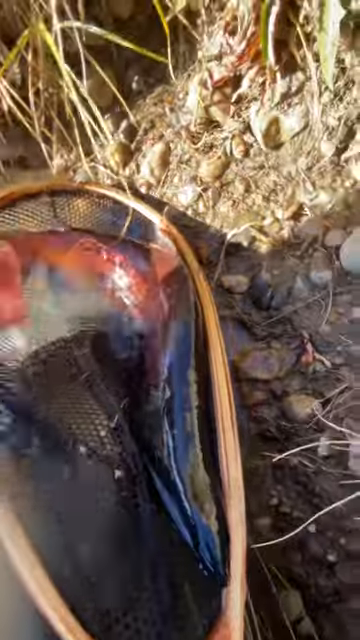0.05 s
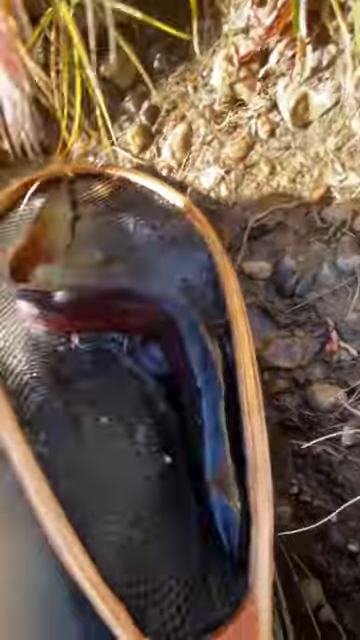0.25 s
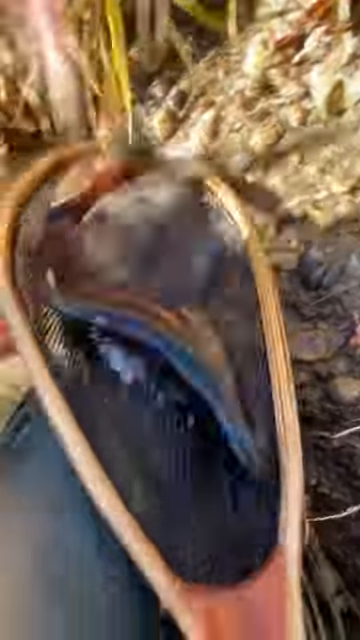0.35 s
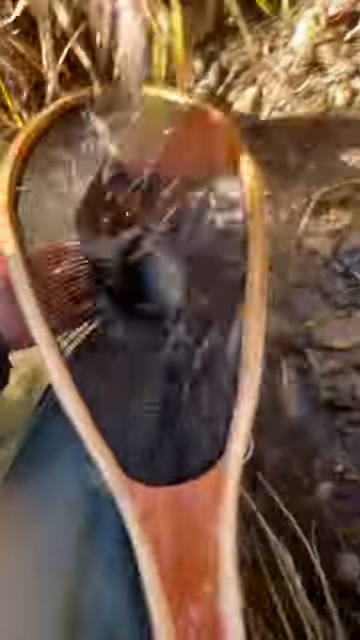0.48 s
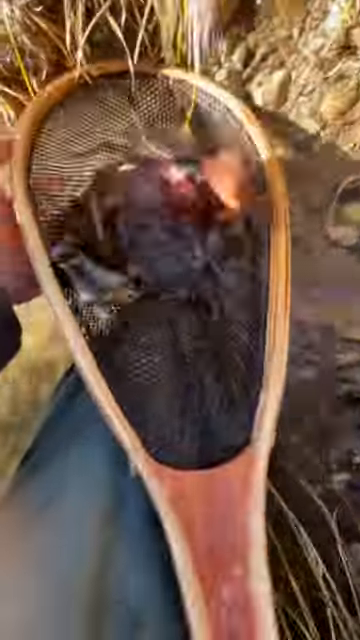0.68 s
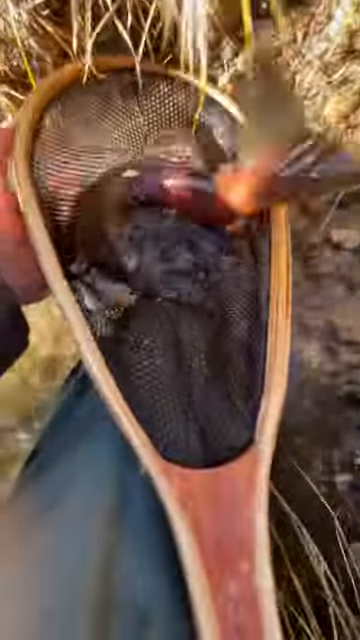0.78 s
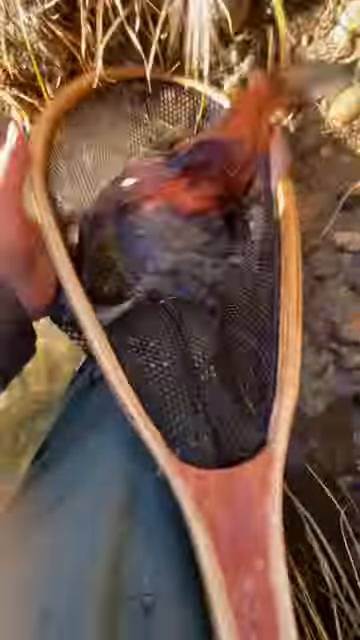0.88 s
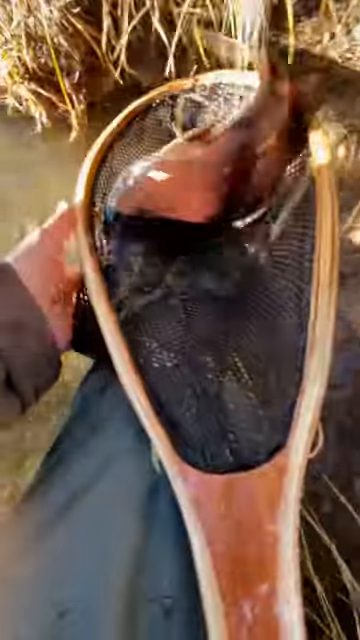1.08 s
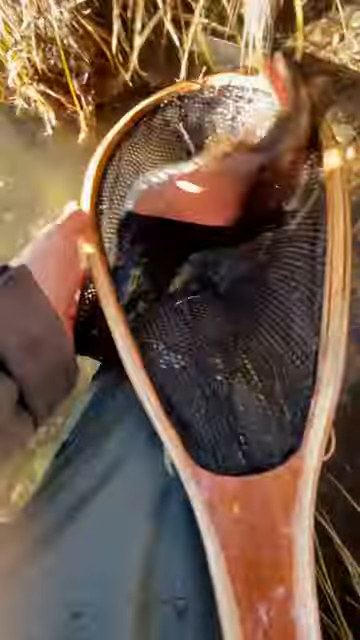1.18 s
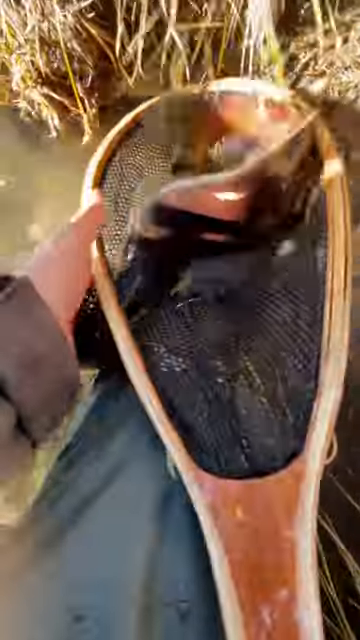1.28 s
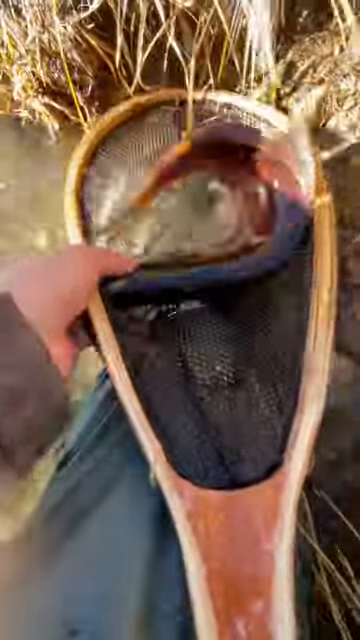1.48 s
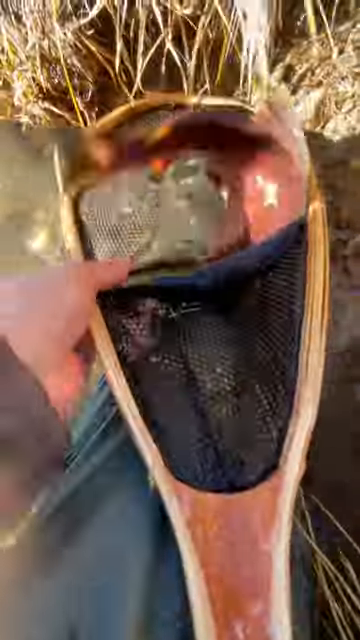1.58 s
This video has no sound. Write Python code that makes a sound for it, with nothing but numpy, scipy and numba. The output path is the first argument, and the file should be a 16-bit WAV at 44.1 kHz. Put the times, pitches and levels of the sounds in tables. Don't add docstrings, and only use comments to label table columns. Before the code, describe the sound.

Fish thrashing in a wet landing net, one hard splashy slap, then weaker spatters and drips

```python
import sys
import numpy as np
from scipy import signal
from scipy.fft import rfft, irfft
from scipy.io import wavfile
from scipy.ndimage import uniform_filter1d
from numba import njit

SR = 44100
rng = np.random.default_rng(int(sys.argv[2]) if len(sys.argv) > 2 else 0)


def volts_from_db(level):
    exponent = np.asarray(level, float) / 20
    return 10 ** exponent


def wrap_up_sound(samples):
    columns = np.atleast_2d(samples).T
    tamed = np.clip(columns, -1, 1)
    steps = np.round(tamed * 32767).astype(np.int16)
    wavfile.write(sys.argv[1], SR, steps)


N = 72765

# start in seconds, peak in dB, centre in Hz, ring T60 in seconds, broad crack in dB.
SLAPS = [(0.2738, -19, 5900, 0.0086, 1.5), (0.2892, -3.5, 2270, 0.02, -5),
         (0.2903, -2.5, 5150, 0.0094, -5.5), (0.3048, -19, 1700, 0.02, -16), (0.3299, -20, 3500, 0.02, -10),
         (0.337, -19, 1990, 0.039, -8), (0.3595, -13, 2560, 0.016, -15), (0.3644, -16.5, 1300, 0.06, -18),
         (.353, -22.5, 2270, .018, -3), (0.373, -26, 1300, 0.023, -7), (0.435, -29, 1530, .015, 1),
         (0.4438, -27, 2550, 0.042, 0), (.479, -36, 1500, 0.014, 0), (0.5313, -21, 3720, 0.017, 0.5),
         (0.536, -19.5, 3240, 0.015, -3.5), (0.54, -21, 910, 0.038, -26), (0.5538, -26.5, 4500, 0.011, 1.5),
         (0.5899, -25.5, 1410, 0.029, -3), (0.629, -28.5, 6600, 0.015, -2.5),
         (0.7816, -23, 3560, 0.038, -10.5), (0.9007, -30.5, 1970, 0.024, -19),
         (0.9534, -30.5, 2600, 0.033, 0), (1.1707, -15, 7900, 0.019, -6), (1.178, -34.5, 7500, 0.023, 5.5),
         (1.2321, -20.5, 10000, 0.025, -1), (1.238, -29.5, 4460, .03, -2), (1.245, -24, 3870, 0.016, -20),
         (1.2555, -28.5, 4930, 0.026, -5.5), (1.2787, -21.5, 5440, 0.02, -8),
         (1.284, -26.5, 9100, 0.022, -18), (1.318, -28.5, 3340, 0.034, 2), (1.3581, -27, 5060, 0.017, 1),
         (1.372, -29, 1880, 0.04, -20), (1.6161, -22, 6700, 0.021, -16)]
# start in seconds, peak in dB, centre in Hz.
SPITS = [(0.171, -28, 10500), (.2294, -32, 9900), (0.281, -25, 10100), (.52, -33, 8500),
         (0.5545, -21.5, 9500), (0.56, -40, 10000), (.5836, -32, 10100), (.592, -39, 10700),
         (0.647, -36.5, 9800), (.6889, -50, 11100), (0.703, -38.5, 10400), (.9233, -35.5, 10600),
         (.9548, -33, 10800), (1.073, -44, 10800), (1.091, -47, 9990), (1.1125, -40, 11300),
         (1.139, -34, 10800), (1.2227, -32, 10200), (1.257, -36, 9800), (1.3389, -40, 8770),
         (1.373, -30, 10500), (1.3927, -31, 9700), (1.447, -47, 10000), (1.509, -40, 9430),
         (1.5406, -39, 9170), (1.6171, -23.5, 10800)]
# frequency in Hz, density in dB per Hz.
SLAP_TONE = [(700, -30), (2100, -3), (3400, -9), (6000, -3.5), (9000, -10), (13000, -24.5), (16000, -13)]
# start in seconds, peak in dB, first pitch in Hz, length in seconds, glide in octaves.
THUMPS = [(.217, -31.5, 191, 0.024, -0.63), (.279, -30.5, 190, 0.01, -0.49),
          (.298, -26, 189.5, 0.017, -0.52), (.314, -32, 192, 0.043, 0.18), (.345, -35, 306, 0.026, 0.0091),
          (.36, -43, 72, 0.039, 0.75), (.54, -35.5, 96, 0.021, -0.099), (.592, -32, 278, 0.011, 0.56),
          (.53, -34, 336, 0.012, -0.012), (.785, -38, 180, 0.019, 0.059), (.91, -45.5, 176, 0.022, 0.09),
          (1.248, -37.5, 137, 0.015, 0.047), (1.262, -40, 65, 0.031, -0.069),
          (1.388, -28.5, 195, 0.025, -1.54), (1.43, -40, 196, 0.0048, 0.93),
          (1.55, -40.5, 123, 0.019, -0.082), (1.58, -42.5, 76, 0.045, 0.32)]
# start in seconds, peak in dB, first pitch in Hz, length in seconds, glide in octaves.
BUBBLES = [(.313, -23, 1020, 0.013, -0.23), (.345, -24, 1860, 0.0082, 0.042),
           (.354, -25, 2170, 0.0056, 0.33), (.367, -30, 1334, 0.018, -0.48), (.384, -26, 1175, .007, -0.19),
           (.458, -33, 944, 0.0058, -0.35), (1.345, -41, 990, 0.0043, 0.017),
           (.523, -34, 677, 0.008, 0.021), (.547, -35, 1404, 0.009, 0.06), (.574, -26, 990, 0.013, 0.39),
           (.590, -32.5, 576, 0.0083, -0.81), (.6385, -33, 5000, 0.0045, 0.084),
           (1.354, -27, 840, 0.013, 0.37), (1.371, -34, 1795, 0.0059, -0.19),
           (1.381, -38.5, 471, 0.014, -0.039)]
# start in seconds, peak in dB, pitch in Hz.
DROPS = [(.391, -35, 4820), (.421, -30.5, 1800), (.491, -30.5, 1670), (.65, -44, 2400), (0.672, -39, 2130),
         (.686, -39, 2220), (0.78, -35, 5500), (0.803, -38, 2480), (1.245, -38, 4030), (.472, -30.5, 2570),
         (.711, -42, 4200), (.735, -47, 2300), (.736, -48, 5760), (.188, -39, 2070), (.258, -34.5, 3820),
         (1.255, -31.5, 2380), (1.358, -37, 4700), (1.482, -40, 4500), (1.507, -42.5, 1800),
         (1.474, -41, 1840)]
# start in seconds, peak in dB.
KNOCKS = [
    (.536, -37),
    (.783, -44.5),
    (.903, -48),
    (1.228, -47.5),
]
# time in seconds, level in dB.
SLOSH_EFFORT = [(0, -63.5), (.07, -48), (.15, -47.5), (.18, -41), (.25, -45.5), (.33, -31.5), (.4, -38),
                (.48, -41), (.515, -44.5), (.6, -47.5), (.75, -59), (.8, -43), (.865, -55.5), (.93, -47.5),
                (1.08, -55), (1.24, -48), (1.4, -47), (1.65, -50)]
# frequency in Hz, density in dB per Hz.
SLOSH_TONE = [(60, -1), (250, -3.5), (560, -10.5), (1000, -3.5), (2300, -4.5), (4000, -4.5), (10000, -28.5),
              (16000, -11)]
# time in seconds, level in dB.
DRAG_LEVEL = [(0, -70.5), (.07, -49), (.15, -50.5), (.175, -45), (.24, -51), (.34, -42), (.46, -46),
              (.515, -57.5), (.75, -60), (.84, -47), (.865, -59.5), (.96, -52), (1.05, -61), (1.22, -52),
              (1.27, -68), (1.305, -60.5), (1.45, -51.5), (1.65, -55.5)]
# frequency in Hz, density in dB per Hz.
DRAG_TONE = [(1500, -28), (4200, -23), (5200, -5), (6200, -6.5), (7000, -17.5), (9000, -9.5), (12500, -16),
             (16000, -34)]
# time in seconds, level in dB.
SWISH_LEVEL = [
    (0, -73),
    (.045, -49),
    (.1, -49.5),
    (.18, -45),
    (.23, -74),
    (.3, -80),
]
# time in seconds, level in dB.
BURBLE_LEVEL = [(0, -85), (.2, -62), (.3, -46.5), (.4, -70), (.5, -64), (.65, -86), (.76, -69), (.9, -55.5),
                (1.03, -63), (1.18, -49.5), (1.3, -69), (1.45, -53), (1.65, -56.5)]
# frequency in Hz, lead of the left in radians.
PORT_LEAD = [(0, 0), (600, 1.7), (1100, .9), (1800, .7), (2700, 2.3), (5600, .8), (7000, 3.14), (8600, 4.5),
             (10000, 6.1), (11400, 6.6), (12900, 9.2), (14500, 9.6), (15900, 12.5)]
# frequency in Hz, share heard alike (0 to 1).
LIKENESS = [(50, .45), (200, .85), (600, .2), (3000, .6), (7000, .62), (12000, .76)]
# frequency in Hz, left minus right in dB.
BALANCE = [(60, 1.5), (200, -5), (600, 3.5), (1500, 1), (5000, -1)]


def unit(x):
    return x / np.sqrt(np.mean(x ** 2))


def noise():
    return rng.standard_normal(N)


def bin_hz():
    return np.arange(N // 2 + 1) * SR / N + 1


def curve(table):
    return np.interp(np.arange(N) / SR, *np.array(table).T)


def colour(x, table):
    hz, db = np.array(table).T
    gain = volts_from_db(np.interp(np.log(bin_hz()), np.log(hz), db, left=-60))
    return unit(irfft(rfft(x) * gain, N))


def walk(rate):
    k = int(SR / rate)
    held = np.repeat(rng.standard_normal(N // k + 1), k)
    return 1.3 * uniform_filter1d(uniform_filter1d(held, k), k)[:N]


def flicker(table, depth_db, rate):
    spectrum = rfft(colour(noise(), table))
    octave = np.log2(bin_hz())
    out = np.zeros(N)
    for centre in range(4, 15):
        band = irfft(spectrum * np.clip(1 - abs(octave - centre), 0, 1), N)
        out += band * volts_from_db(depth_db * walk(rate))
    return unit(out)


def resonant_noise(x, hz, q):
    b, a = signal.iirpeak(hz, q, SR)
    return unit(signal.lfilter(b, a, signal.lfilter(b, a, x)))


@njit
def add(out, start, size, hz, length, glide, rise):
    for k in range(len(start)):
        n, phase = length[k] * SR, 0.
        for i in range(int(2.5 * n)):
            u, j = i / n, int(start[k] * SR) + i
            if j >= len(out):
                break
            phase += 2 * np.pi * min(hz[k] * 2 ** (glide[k] * min(u, 1.3)), 19000.) / SR
            out[j] += size[k] * u / rise * np.exp(1 - u / rise) * np.sin(phase)


def tones(table, rise):
    out = np.zeros(N)
    start, db, hz, length, glide = np.array(table, float).T.copy()
    add(out, start, volts_from_db(db), hz, np.maximum(length, .001), glide, rise)
    return out


def swarm(hz, octaves, cycles, scatter_db, count):
    when, size, loud, life = rng.random((count, 4)).T
    out = np.zeros(N)
    pitch = hz * 2 ** (octaves * np.log(size / (1 - size)) / 1.778)
    level = volts_from_db(np.minimum(-scatter_db * np.log(loud), 2.6 * scatter_db))
    add(out, when * N / SR, level, pitch, cycles / pitch * (.5 + life), .3 * life, .3)
    return unit(out)


def slaps():
    rise_s, width = 0.001, 0.68
    lead_db, lead_t60_s = -18, 0.053
    spray_db, spray_t60_s = -23, 0.19
    out = np.zeros(N)
    t = np.arange(-900, 5000) / SR
    broad = colour(noise(), SLAP_TONE)
    white = rng.standard_normal(N + len(t))
    crackle = unit(volts_from_db(3 * walk(1500)))
    gathering = np.clip(1 + t / rise_s, 0, 1) ** 2 + volts_from_db(lead_db + 60 * t / lead_t60_s)
    spray = volts_from_db(spray_db - 60 * t / spray_t60_s)
    spits = [(s, db, hz, .011, -7) for s, db, hz in SPITS]
    for s, db, hz, t60, broad_db in SLAPS + spits:
        i = int((s + rise_s + t[0]) * SR)
        n = min(len(t), N - i)
        body = resonant_noise(white[i:i + len(t)], hz, 1 / width)[:n]
        body = body + volts_from_db(broad_db) * broad[i:i + n]
        envelope = np.where(t < 0, gathering, volts_from_db(-60 * t / t60) + spray)[:n]
        out[i:i + n] += 0.37 * volts_from_db(db) * body * crackle[i:i + n] * envelope
    return out


def thumps():
    return tones(THUMPS, rise=0.24)


def bubbles():
    return tones(BUBBLES, rise=.3)


def drops():
    return tones([(s, db, hz, 0.0042, .1) for s, db, hz in DROPS], rise=.3)


def knocks():
    return tones([(s, db, 670, 0.017, 0) for s, db in KNOCKS], rise=.3)


def slosh():
    fizz = swarm(1700, octaves=0.783, cycles=5.6, scatter_db=2.5, count=2600)
    wash = flicker(SLOSH_TONE, depth_db=3.85, rate=35.23)
    return volts_from_db(curve(SLOSH_EFFORT)) * (wash + volts_from_db(-4) * fizz)


def drag():
    mist = swarm(6890, octaves=.45, cycles=8.7, scatter_db=3.2, count=2400)
    hiss = flicker(DRAG_TONE, depth_db=3.6, rate=40)
    return volts_from_db(curve(DRAG_LEVEL)) * (hiss + volts_from_db(2) * mist)


def swish():
    centre_hz, width_hz = 5650, 1200
    return volts_from_db(curve(SWISH_LEVEL)) * resonant_noise(noise(), centre_hz, centre_hz / width_hz)


def burble():
    return volts_from_db(curve(BURBLE_LEVEL)) * swarm(404.4, octaves=0.524, cycles=8.9, scatter_db=1.1, count=350)


def rumble():
    swell_db = -56.5 + 0.85 * (curve(SLOSH_EFFORT) + 45) + 1.9 * walk(14.8)
    return volts_from_db(swell_db) * resonant_noise(noise(), 60.6, .8)


def background():
    return slosh() + drag() + rumble() + burble()


def scene():
    f = bin_hz()

    def over(table):
        hz, value = np.array(table).T
        return np.interp(np.log(f), np.log(hz), value)

    wash = rfft(background() + swish())
    other = rfft(background())
    ringing = (bubbles() + drops() + knocks()) * volts_from_db(3.2 * walk(450))
    hits = rfft(slaps() + ringing + thumps())

    like = np.clip(over(LIKENESS), 0, 1)
    lead = np.interp(f, *np.array(PORT_LEAD).T)
    tilt = volts_from_db(over(BALANCE) / 2) * np.exp(.5j * lead)
    in_step = 1 - np.clip(f / 4500, 0.75, 1)
    near = tilt * np.exp(-.5j * lead * in_step)
    mid = np.sqrt((1 + like) / 2) * wash
    side = volts_from_db(-7.5) * rfft(slaps()) + np.sqrt((1 - like) / 2) * other
    left = irfft(hits * near + (mid + side) * tilt, N)
    right = irfft(hits / near + (mid - side) / tilt, N)
    return np.array([left, right])


def joint(x):
    weak_db, from_hz, jump_db = -5.2, 5500, 5
    f, _, z = signal.stft(np.array([x[0] + x[1], x[0] - x[1]]) / 2, SR, nperseg=1024)
    power = uniform_filter1d(uniform_filter1d(abs(z) ** 2, size=16, axis=1), size=5, axis=2)
    power = power[:, ::12].repeat(12, axis=1)[:, :len(f)]
    treble = (abs(z[:, f > from_hz]) ** 2).sum(axis=(0, 1))
    hit = treble > volts_from_db(2 * jump_db) * signal.medfilt(treble, 11)
    strong = power > volts_from_db(2 * weak_db) * power[::-1]
    keep = strong | (f < from_hz)[:, None] | hit
    mid, side = signal.istft(z * keep, SR, nperseg=1024)[1][:, :N]
    return np.array([mid + side, mid - side])


def top_cut(x):
    return signal.sosfilt(signal.butter(12, 17130, fs=SR, output="sos"), x)


def record(dry):
    rounded = 2 * np.tanh(dry / 2)
    low_pass = signal.ellip(8, .2, 70, 15700, fs=SR, output="sos")
    mix = joint(signal.sosfiltfilt(low_pass, rounded))
    return top_cut(mix)


dry = scene()
out = record(dry)
wrap_up_sound(out)
```